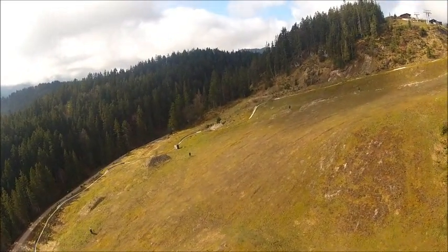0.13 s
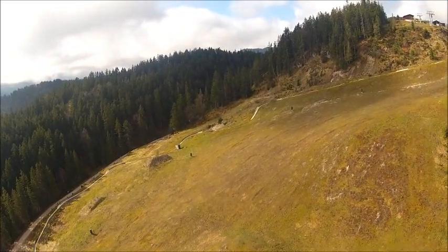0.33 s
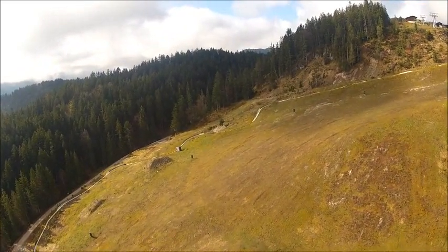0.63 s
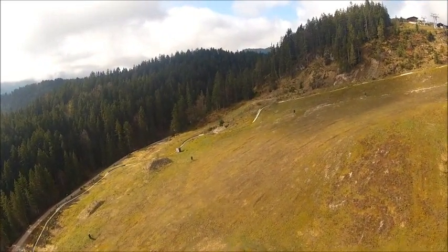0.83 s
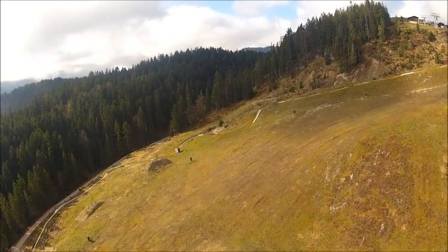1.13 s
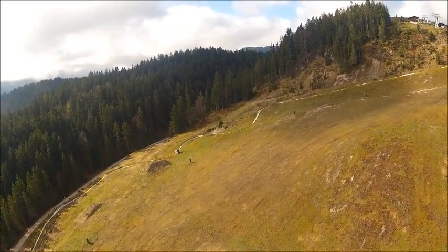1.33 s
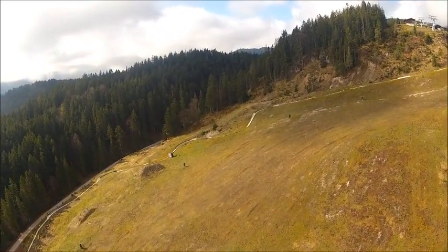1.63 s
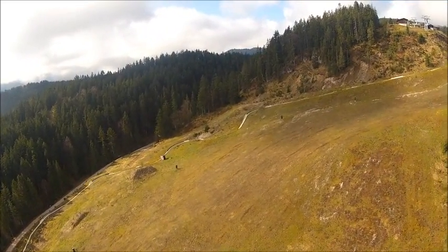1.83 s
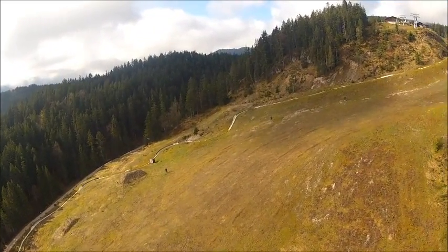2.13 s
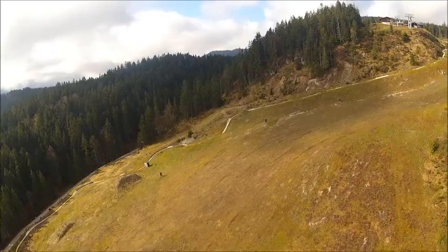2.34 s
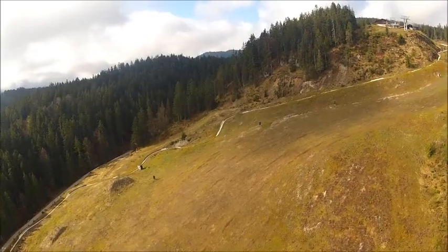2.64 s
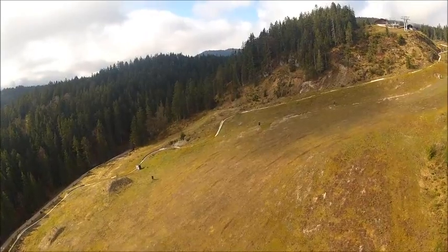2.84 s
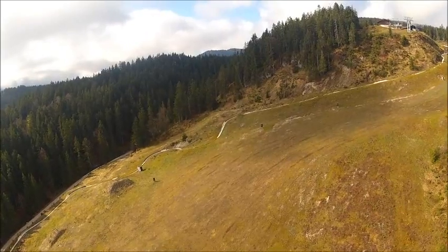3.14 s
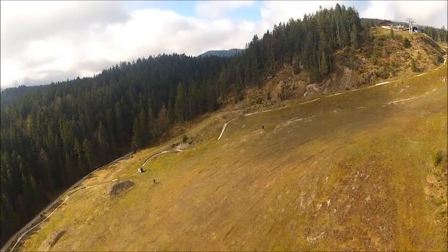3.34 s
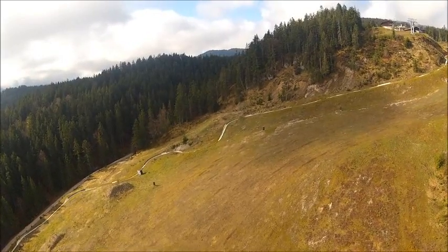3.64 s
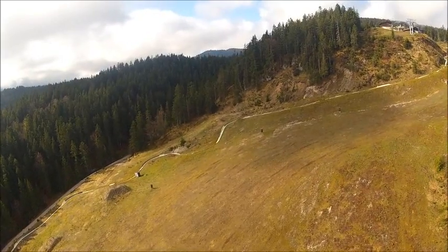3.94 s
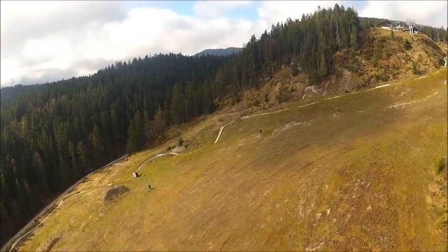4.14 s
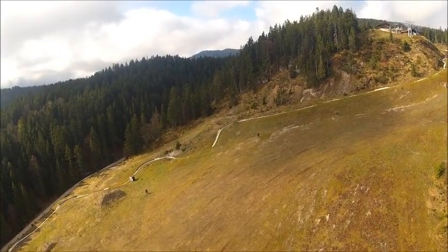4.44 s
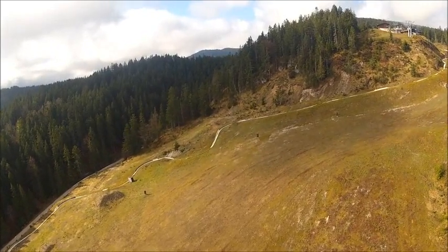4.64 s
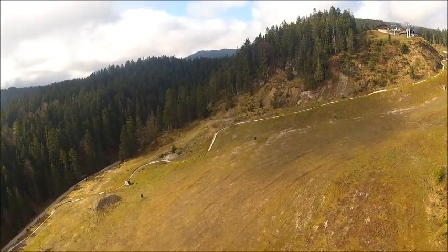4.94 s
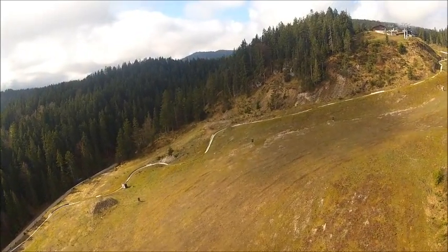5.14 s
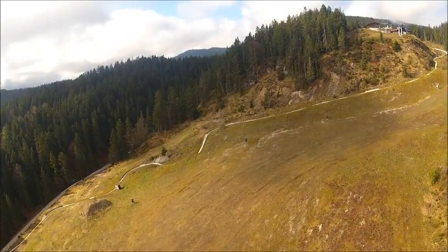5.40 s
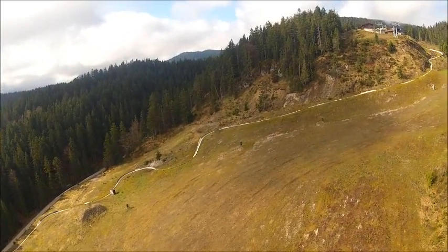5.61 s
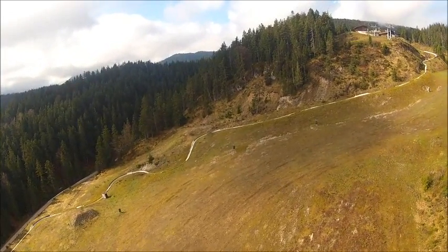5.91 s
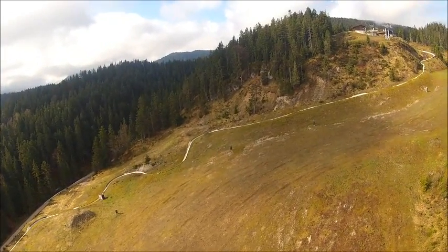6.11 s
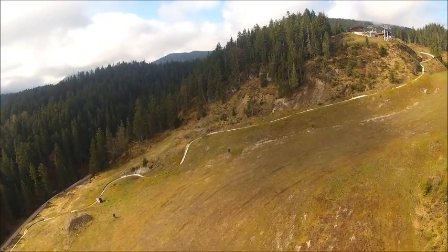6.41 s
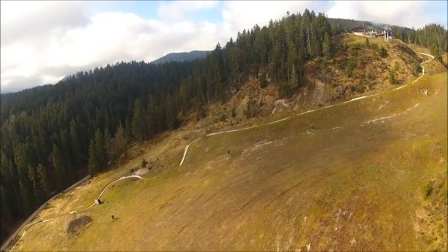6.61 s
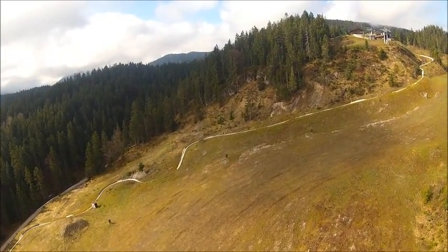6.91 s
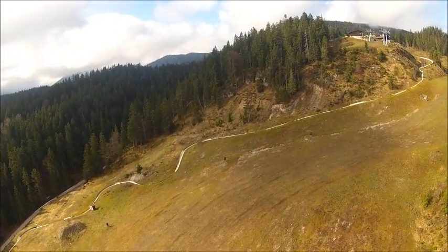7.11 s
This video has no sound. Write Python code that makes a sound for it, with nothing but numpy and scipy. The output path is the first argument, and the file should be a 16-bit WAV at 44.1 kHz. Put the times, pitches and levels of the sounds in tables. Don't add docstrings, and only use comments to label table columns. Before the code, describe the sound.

A multicopter drone hums roughly and steadily in flight, motors whining and beating, while propeller wash buffets, crackles and thumps at a cheap onboard microphone.

```python
import sys
import numpy as np
from scipy import signal
from scipy.fft import rfft, irfft, next_fast_len
from scipy.io import wavfile

SR = 44100
rng = np.random.default_rng(int(sys.argv[2]) if len(sys.argv) > 2 else 0)


def wav_record(signal):
    frames = np.transpose(np.atleast_2d(signal))
    bounded = np.clip(frames, -1, 1)
    quanta = np.round(bounded * 32767).astype(np.int16)
    wavfile.write(sys.argv[1], SR, quanta)


def field_ratio(decibels):
    return 10 ** (np.asarray(decibels, dtype=float) / 20)


N = 320166
POLE_ORDER = 28
SWITCH_HZ = 7598


def rms_one(x):
    return x / np.sqrt(np.mean(x ** 2) + 1e-20)


def in_time(rows):
    s, *columns = np.transpose(rows)
    return [np.interp(np.arange(N) / SR, s, c) for c in columns]


def swells(rows):
    s, length, *columns = np.transpose(rows)
    coarse = np.arange(N // 64 + 2) * 64 / SR
    bells = np.exp(-.5 * ((coarse[:, None] - s) / length) ** 2)
    return [np.interp(np.arange(N) / SR, coarse, bells @ c) for c in columns]


def drift(rate):
    r = np.exp(-2 * np.pi * rate / SR)
    wander = signal.lfilter([1], [1, -2 * r, r * r], rng.standard_normal(N + SR))
    return rms_one(wander[SR:])


def colour(x, spectrum):
    size = next_fast_len(N)
    hz, level_db = np.transpose(spectrum)
    bins = np.log(np.arange(size // 2 + 1) * SR / size + 1)
    gain = field_ratio(np.interp(bins, np.log(hz), level_db))
    return rms_one(irfft(rfft(x, size) * gain, size)[:N])


def turns(hz):
    return 2 * np.pi * (np.cumsum(hz) / SR + rng.random())


def tone(phase, flutter_db, rate):
    return np.sqrt(2) * np.sin(phase) * field_ratio(flutter_db * drift(rate))


def rotor(shaft, orders, flutter_db):
    hum = 0
    for k, db in orders:
        phase = k * shaft + rng.random() * 2 * np.pi
        hum = hum + field_ratio(db) * tone(phase, flutter_db, rate=19.0)
    return hum


# (time [s], fast hum swell [dB])
THRUST = [(0, -5), (.15, 0), (1.13, -1), (1.35, 2), (1.8, -7), (2.65, 4.5), (2.85, 0.1), (3.3, 2.5),
          (3.58, -1), (3.94, 4.5), (4.25, -2), (4.7, 2.5), (6.0, 1.1), (6.35, -1.5), (6.85, 6), (7.26, 3.5)]


def thrust_swell():
    return in_time(THRUST)[0]


# (time [s], whine [Hz])
NEAR_WHINE = [(0.0, 4342), (0.3, 4372), (1.0, 4402), (1.35, 4397), (1.62, 4430), (1.8, 4480), (2.4, 4395),
              (2.62, 4394), (2.95, 4355), (3.6, 4404), (4.25, 4430), (4.75, 4388), (5.2, 4433), (5.9, 4434),
              (6.2, 4376), (6.7, 4374), (6.9, 4398), (7.26, 4378)]
# (time [s], length [s], whine swell [dB], blade slap swell [dB])
NEAR_BITES = [
    (.07, .1, 5, 0),
    (1.0, .8, 0, -2),
    (3.0, .3, 1.5, 0),
    (4.0, .5, 0, 2.5),
    (4.85, .4, 2, 4),
    (6.65, .08, 2.5, 1),
    (7.2, .1, 2, 2),
]
# (multiple of revolutions [-], level [dB])
NEAR_ORDERS = [(1, 1.5), (2, -0.9)]
# (multiple of revolutions [-], level [dB])
NEAR_UPPER = [(3, -12.5), (4, -13.5), (6, -20.5), (8, -28.5), (10, -32), (14, -34.5)]


def near_rotor(thrust_db):
    bite_db, slap_db = swells(NEAR_BITES)
    hum_db = -21.5 - 0.32 * thrust_db
    upper_db = -21 + slap_db
    whine_hz = in_time(NEAR_WHINE)[0] + 2.04 * drift(6.9)
    whine_db = -42.5 + bite_db - .065 * (whine_hz - 4400)
    shaft = turns((SWITCH_HZ - whine_hz) / POLE_ORDER)
    whine = turns(whine_hz)
    out = field_ratio(hum_db) * rotor(shaft, NEAR_ORDERS, flutter_db=1.04)
    out += field_ratio(upper_db) * rotor(shaft, NEAR_UPPER, flutter_db=1.0)
    out += field_ratio(whine_db + 3.0) * tone(whine, flutter_db=1.0, rate=36.0)
    out += field_ratio(whine_db - 13) * tone(whine - shaft, flutter_db=2.5, rate=3.0)
    return out, shaft


# (time [s], whine [Hz], whine [Hz], whine [Hz])
FAST_WHINE = [(0.0, 3797, 3810, 3824), (0.35, 3835, 3858, 3887), (1.0, 3855, 3871, 3918),
              (1.25, 3832, 3855, 3893), (1.8, 3905, 3930, 3975), (1.9, 3870, 3884, 3930),
              (2.2, 3829, 3845, 3858), (2.55, 3808, 3843, 3857), (2.8, 3775, 3800, 3822),
              (3.05, 3820, 3845, 3868), (3.5, 3835, 3860, 3912), (3.9, 3858, 3870, 3890),
              (4.15, 3804, 3822, 3888), (5.2, 3790, 3812, 3868), (5.45, 3822, 3840, 3882),
              (5.8, 3786, 3830, 3855), (6.6, 3813, 3828, 3876), (7.26, 3824, 3858, 3877)]
# (time [s], level [dB], level [dB], level [dB])
FAST_LEVEL = [(0, -47, -38, -45), (.8, -39, -46, -40), (1.5, -47, -37, -47), (2.55, -44, -35, -46),
              (2.8, -44, -46, -36), (3.5, -44, -36, -39), (4.6, -39, -46, -36.5), (5.8, -42, -43, -36.5),
              (6.7, -47, -37, -39), (7.26, -43, -39, -37)]
# (time [s], length [s], whine shift of the slower two motors [Hz], of the fastest [Hz])
CORRECTIONS = [(.25, .05, -8, 8), (.6, .15, -6, 4), (.95, .04, 0, 14), (1.51, .045, 17, 12),
               (1.635, .035, -42, -18), (2.4, .045, -55, -45), (2.7, .04, -25, -30), (4.35, .05, 8, 9),
               (4.5, .08, 6, -12), (4.73, .04, -6, -14), (5.0, .06, 4, 15), (5.22, .04, 0, -10),
               (5.35, .05, 8, 22), (5.9, .04, 0, -8), (6.04, .04, 0, 15), (6.18, .05, 0, 8),
               (6.28, .04, -8, -22), (6.82, .08, 44, 42)]
# (time [s], length [s], swell [dB])
FLARES = [(0.13, .06, 7), (0.55, .05, 3.5), (0.93, .035, 6), (1.49, .022, 13), (1.522, .008, -8),
          (1.556, .026, 13), (1.78, .07, -7), (1.91, .025, 5), (2.42, .035, -7), (2.52, .05, 3),
          (2.71, .025, -5), (4.93, .06, 3), (5.93, .04, 3), (6.8, .05, 3), (7.18, .04, 2)]
# (multiple of revolutions [-], level [dB])
FAST_ORDERS = [(2, -4.5), (4, -17), (13, -35.5), (14, -36), (15, -34.5)]


def fast_rotors(thrust_db):
    pair_hz, top_hz = swells(CORRECTIONS)
    swell_db, = swells(FLARES)
    shifts_hz = (pair_hz, pair_hz, top_hz)
    hums_db = (1, -4, -9)
    out = np.zeros(N)
    for hz, shift_hz, whine_db, hum_db in zip(in_time(FAST_WHINE), shifts_hz, in_time(FAST_LEVEL), hums_db):
        hz = hz + shift_hz + 3.76 * drift(9.14)
        spin = turns(hz / POLE_ORDER)
        out += field_ratio(-24 + thrust_db + hum_db) * rotor(spin, FAST_ORDERS, flutter_db=0.5)
        pole = tone(POLE_ORDER * spin, flutter_db=1.75, rate=2.9)
        side = field_ratio(-13) * tone((POLE_ORDER + 1) * spin, flutter_db=2.5, rate=3.0)
        mixed_phase = turns(SWITCH_HZ - hz / 2)
        mixed = field_ratio(-20) * tone(mixed_phase, flutter_db=3.0, rate=20.0)
        out += field_ratio(whine_db + swell_db) * (pole + side + mixed)
    return out


# (time [s], peak level [dB], width [ms], sign [-])
THUMPS = [(0.0468, -0.5, 1.4, -1), (0.1175, -7, 0.93, 1), (0.1727, 3.5, 1.3, 1), (0.3146, -6.5, 1.3, -1),
          (0.7155, -4, 0.55, -1), (0.823, 3.5, 1.1, 1), (1.022, 0, 1.3, -1), (1.206, -7, 1.0, -1),
          (1.584, 2, 1.16, 1), (1.737, -13, 1.0, 1), (2.101, 2, 1.1, -1), (2.5134, 2.5, 0.83, -1),
          (2.574, -1, 0.78, -1), (2.6003, -4, 0.33, -1), (2.6703, 2, 0.86, -1), (2.9637, 1.5, 1.3, -1),
          (3.1284, -1.5, 1.2, -1), (3.172, -4.5, 0.62, -1), (3.245, -2, 1.5, 1), (4.2547, -7, 1.2, 1),
          (4.7999, 0.5, 1.1, 1), (5.154, -8, 1.6, -1), (5.4392, 0, 1.1, -1), (5.8021, -0.5, 1.4, -1),
          (5.942, -10, 0.77, -1), (6.26, -2, 0.62, 1), (6.513, -7, 0.35, 1), (6.8404, 1.5, 1.1, -1),
          (6.9971, 0, 1.4, -1), (7.2154, -3, 1.9, -1)]


def thumps():
    out = np.zeros(N)
    for s, peak_db, width_ms, sign in THUMPS:
        first = max(round((s - .01) * SR), 0)
        last = min(round((s + .01) * SR), N)
        at = np.arange(first, last)
        u = (at / SR - s) * 1000 / width_ms
        push = np.exp(-np.abs(u) * 1.5)
        rebound = .3 * np.exp(-(u / 2.4) ** 2)
        out[at] += np.sign(sign) * field_ratio(peak_db) * (push - rebound) / .7
    return out


def eddies(per_s, spread_db):
    sizes = field_ratio(spread_db * np.minimum(rng.exponential(1, N), 4)) * rng.choice([-1, 1], N)
    return sizes * (rng.random(N) < per_s / SR)


# (time [s], turbulence level [dB], blade load level [dB])
AIR = [(0, 1, 2.5), (.6, 3.5, 1), (1.1, 1, -0.3), (1.7, 0.5, 0.5), (2.1, 2.1, -1), (2.9, 2.5, 0),
       (3.3, -0.5, -1.5), (3.8, -1.5, 0), (4.4, -4, -1.7), (4.75, -5, 3), (5.25, -9, 2), (5.5, -1, -1.5),
       (6.1, 2, -0.8), (6.7, 2, 2), (7.26, 0.2, 1.5)]
# (time [s], length [s], swell [dB])
GUSTS = [(.11, 0.028, 6.5), (.18, 0.032, 3.5), (.31, 0.023, 5), (.41, 0.021, -3.5), (.55, .08, -2),
         (.77, .04, -3.5), (1.17, 0.057, -2.5), (1.23, 0.028, 3), (1.41, 0.011, 2), (1.62, 0.048, -0.5),
         (1.99, 0.011, -1), (2.14, 0.009, 4), (2.6, .06, 2.5), (2.94, 0.032, 3.5), (3.0, 0.016, 2.5),
         (3.41, 0.089, 3), (3.8, 0.047, -1.5), (4.0, 0.017, -3.5), (4.4, 0.073, 4), (4.84, 0.023, 0),
         (5.75, 0.073, 0.5), (5.84, 0.022, -4), (6.24, 0.016, 4), (6.515, 0.039, 4), (6.72, 0.023, 4),
         (6.8, .02, -1), (6.86, .03, 2), (7.06, .015, 3)]
# (frequency [Hz], level per Hz [dB])
BUFFET = [(25, -42), (50, -5), (80, -5.5), (160, 1.5), (300, -2), (500, -12), (900, -28.5), (1500, -41.5)]
# (frequency [Hz], level per Hz [dB])
CRACKLE = [(150, -17.5), (400, 2.5), (700, -1.5), (1200, -7), (1800, -13), (3000, -16.5), (5200, -49),
           (6000, -48)]
# (frequency [Hz], level per Hz [dB])
HISS = [(800, 2), (1800, -7.5), (2600, -5), (3300, -0.5), (4200, 5), (5000, 4), (5500, -2), (5950, -6.5),
        (6400, -40)]


def prop_wash(shaft):
    turbulence_db, load_db = in_time(AIR)
    swell_db, = swells(GUSTS)
    gust = drift(34.0)
    blade = np.sin(shaft + 2.0)
    lumps = rms_one(eddies(per_s=900, spread_db=3.5)) + 0.75 * rng.standard_normal(N)
    buffet = colour(lumps * field_ratio(1.03 * gust), BUFFET)
    crackle = colour(lumps * field_ratio(1.62 * gust + 3.3 * blade), CRACKLE)
    hiss_db = 0.18 * gust + 0.7 * drift(135) + 1.0 * blade
    hiss = colour(rng.standard_normal(N) * field_ratio(hiss_db), HISS)
    out = field_ratio(-20.5 + 0.062 * turbulence_db + 0.74 * swell_db) * buffet
    out += field_ratio(-30.5 + turbulence_db + swell_db) * crackle
    out += field_ratio(-32 + load_db + 0.67 * swell_db) * hiss
    return out


def scene():
    thrust_db = thrust_swell()
    near, shaft = near_rotor(thrust_db)
    return (near + fast_rotors(thrust_db) + thumps() + prop_wash(shaft))[None, :]


def gain_control(x, knee_db=-7.0, ratio=0.61, release_db_s=48.0, attack_ms=2.2):
    over = ratio * np.maximum(20 * np.log10(np.abs(x) + 1e-9) - knee_db, 0)
    ramp = release_db_s * np.arange(N) / SR
    held = np.maximum.accumulate(over + ramp) - ramp
    r = np.exp(-1000 / (attack_ms * SR))
    cut_db = signal.lfilter([1 - r], [1, -r], held)
    return x * field_ratio(1.0 - cut_db)


def sample_and_hold(x, idle_db=-68):
    up, down, repeat = 40, 147, 4
    coarse = signal.resample_poly(x, up, down)
    coarse = coarse + field_ratio(idle_db) * (-1.) ** np.arange(len(coarse))
    steps = np.repeat(coarse, repeat)
    return signal.resample_poly(steps, down, up * repeat)[:N]


def top_cut(x):
    return signal.sosfilt(signal.butter(12, 15700, fs=SR, output="sos"), x)


def record(dry):
    capsule = signal.butter(2, 70.0, "high", fs=SR, output="sos")
    levelled = gain_control(signal.sosfilt(capsule, dry[0]))
    limited = levelled / (1 + np.abs(levelled / .99) ** 6) ** (1 / 6)
    held = sample_and_hold(limited)
    band_limit = signal.ellip(12, .2, 50, 15310, fs=SR, output="sos")
    mix = signal.sosfilt(band_limit, held)[None, :]
    return top_cut(mix)


dry = scene()
out = record(dry)
wav_record(out)
```